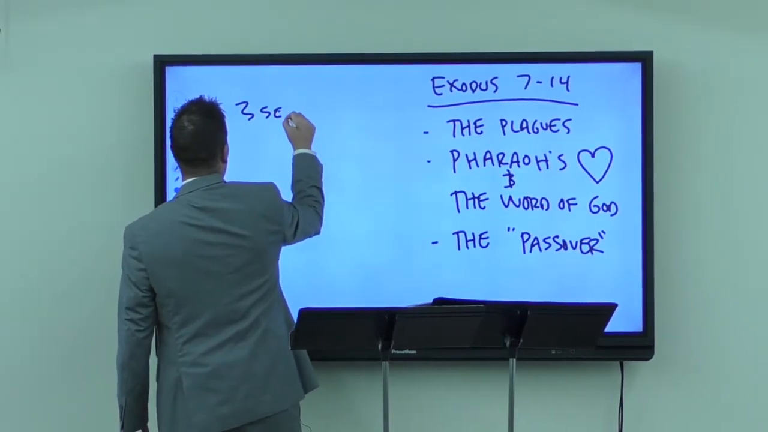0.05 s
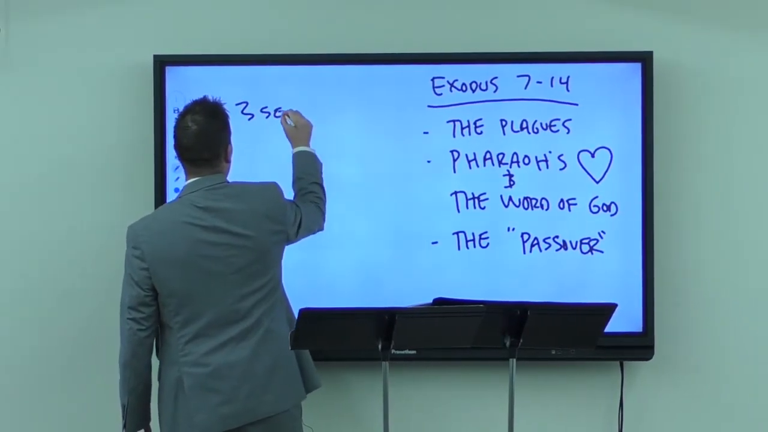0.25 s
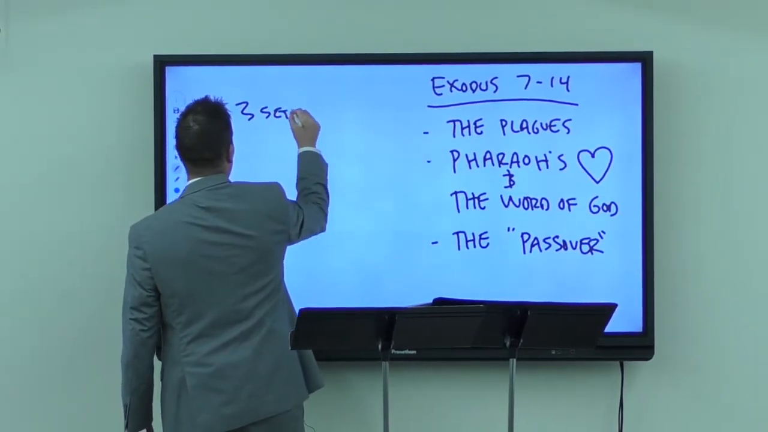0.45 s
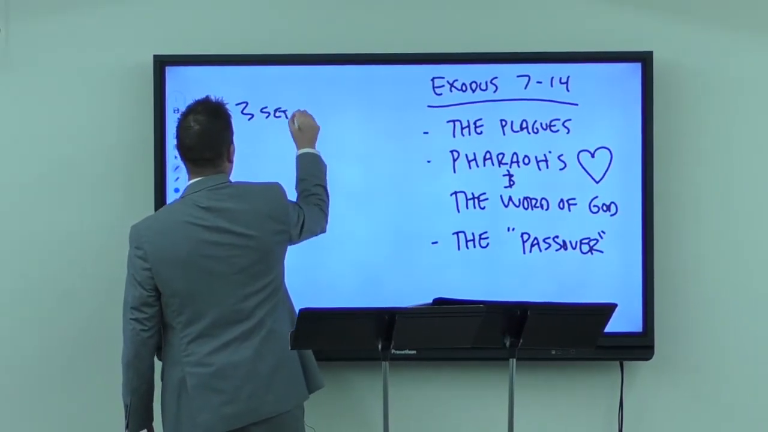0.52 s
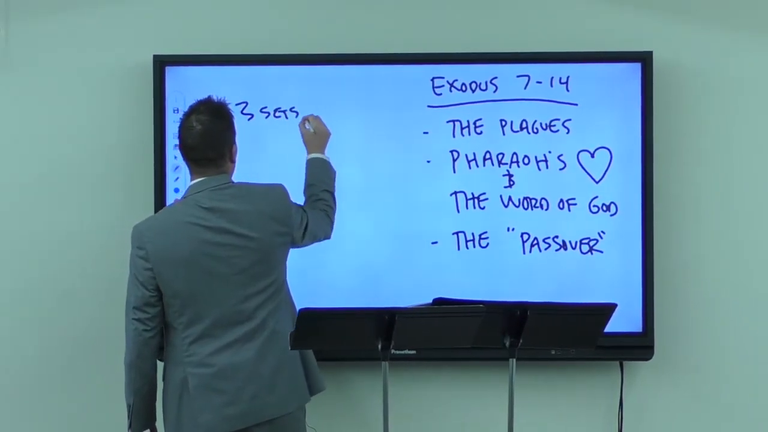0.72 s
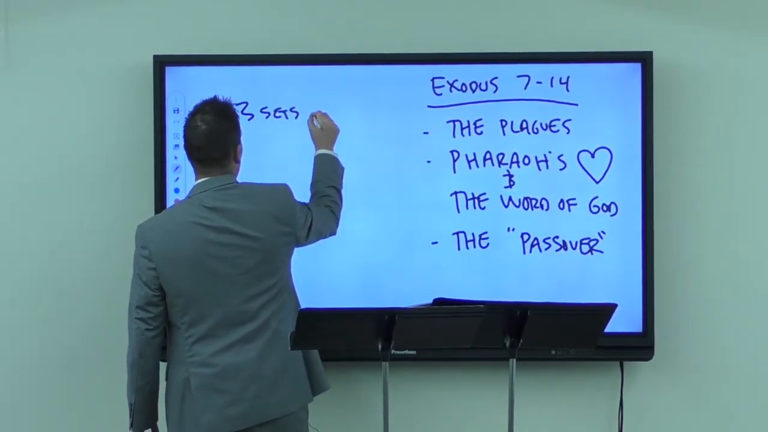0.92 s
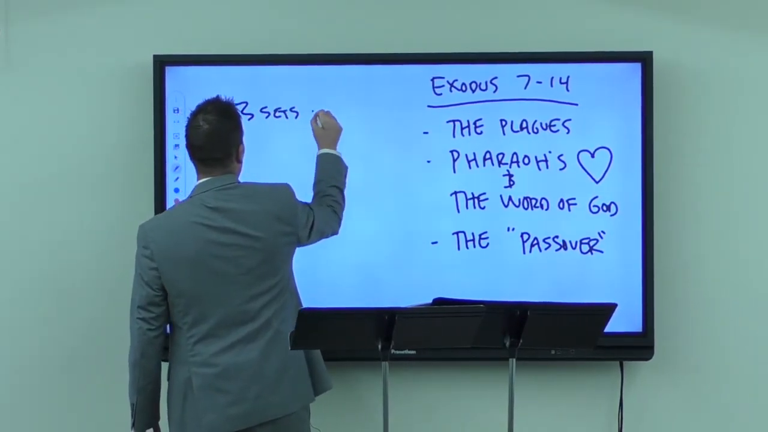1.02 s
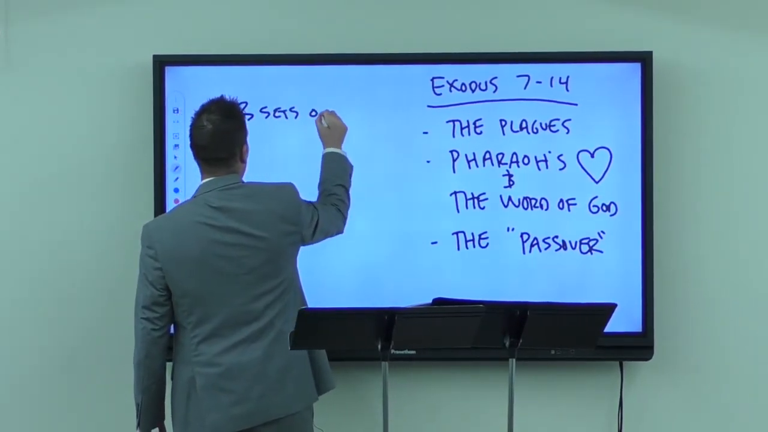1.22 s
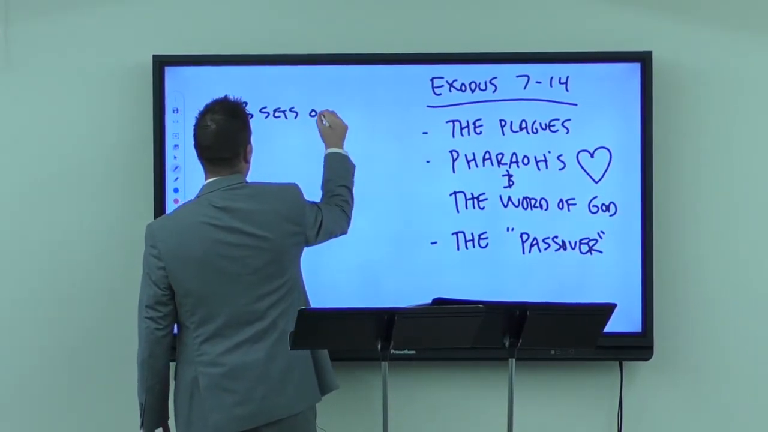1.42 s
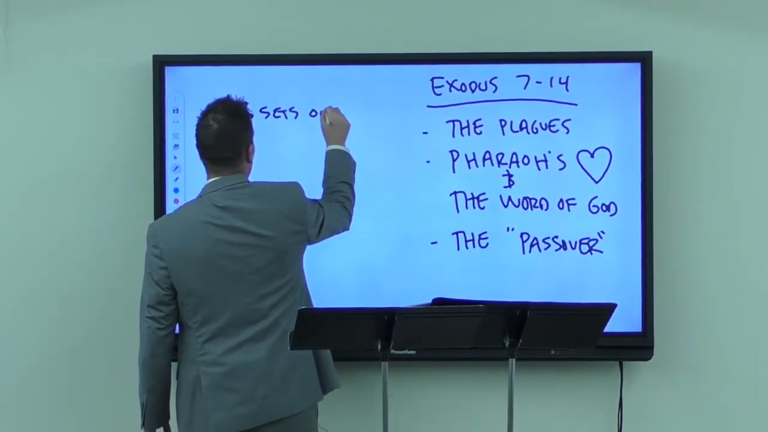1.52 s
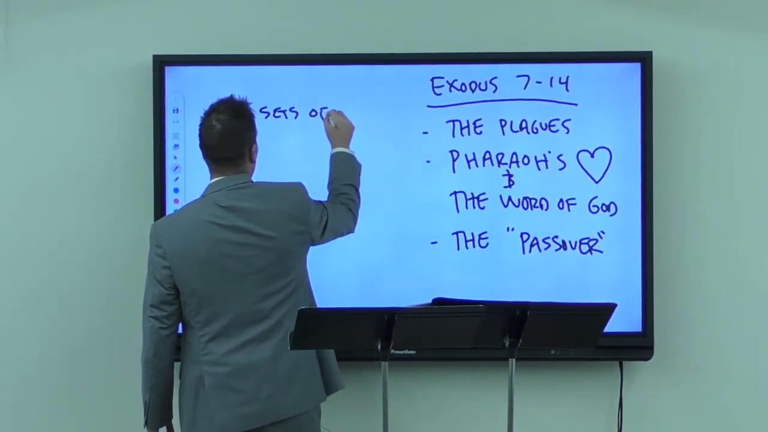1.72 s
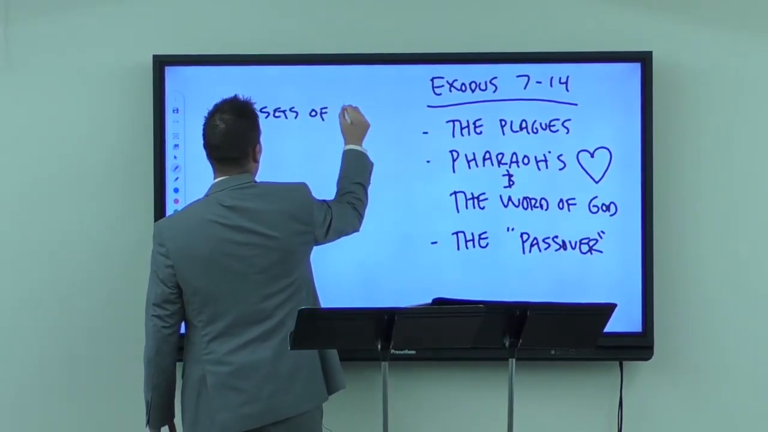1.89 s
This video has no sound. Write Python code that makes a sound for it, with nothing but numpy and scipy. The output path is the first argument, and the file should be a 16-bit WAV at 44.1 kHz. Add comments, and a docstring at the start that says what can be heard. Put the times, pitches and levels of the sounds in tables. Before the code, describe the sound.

A stylus writes on a large wall-mounted glass touchscreen: seven sharp, hollow taps at uneven gaps, with a few faint brushes between, ringing briefly in a hall over low ventilation, heard in mono at some distance.

```python
"""First the fading reverberation of a tap is heard over low ventilation: a stylus writes on wall-mounted glass.
Filtered noise and steady sines make the ventilation; short bands of noise make the brushing of the tip.
Each tap sums damped panel modes (the hollow knock) and a dense crack (the sharp tick).
Convolution with the hall's response adds a few echoes, standing waves and a tail to taps and brushes.
"""
import sys
import numpy as np
from scipy import signal
from scipy.fft import rfft, irfft
from scipy.io import wavfile

SR = 44100
rng = np.random.default_rng(int(sys.argv[2]) if len(sys.argv) > 2 else 0)


def inscribe(sig):
    """Save sig as 16-bit PCM at rate SR to the path in sys.argv[1].

    A 1-D sig is mono; a 2-D sig holds one channel per row.
    Samples are clipped to [-1, 1] before scaling.
    """
    pcm = np.round(np.clip(np.atleast_2d(sig).T, -1, 1) * 32767)
    wavfile.write(sys.argv[1], SR, pcm.astype(np.int16))


N = 85995
TIME = np.arange(N) / SR  # s

# Spectrum of the ventilation air, relative: (frequency [Hz], density [dB per Hz])
AIR_SPECTRUM = [(15, -24), (25, -7), (80, -4.5), (180, -29.5), (796, -28.5), (1940, -41), (2220, -39.5),
                (3620, -42.5), (5000, -43.5), (16000, -51)]
AIR_DB = -54  # rms
# Steady hum of the ventilation: (frequency [Hz], rms level [dB])
HUM_TONES = [(58, -61), (120, -69.5)]

# Echoes off the nearest walls, before the wall's low-pass: (delay [s], level [dB])
WALL_ECHOES = [(.0125, -28.5), (.024, -23), (.029, -20), (.041, -21), (.088, -28)]
ECHO_T60_S, WALL_CUT_HZ = 0.0068, 4700
# Spectrum of the hall's tail against the direct sound: (frequency [Hz], level [dB])
TAIL_SPECTRUM = [(115, -0.5), (190, 1), (290, 1.5), (390, -2), (500, -17), (750, -8.5), (1250, -13),
                 (1800, -9), (2500, -16.5), (3800, -11), (5800, -23.5), (12000, -14)]
# Reverberation time of the tail: (frequency [Hz], t60 [s])
TAIL_T60 = [(125, 0.76), (500, 0.6), (1200, 0.54), (4000, 0.55), (8000, 0.69), (14000, 0.44)]
TAIL_BUILD_S = 0.007
# Standing waves of the hall: (frequency [Hz], peak gain [dB], t60 [s])
STANDING_WAVES = [(122.4, -64, 0.5), (249, -60.5, 0.55), (304, -51.5, 0.55), (369.6, -60.5, 0.93)]
# Bright scatter from the wall, the writer and the stands
NEAR_DB, NEAR_T60_S = -15.5, 0.077
NEAR_ABOVE_HZ, NEAR_BELOW_HZ = 750, 2040

# Rubs of the tip or sleeve on the glass, rms level before the envelope:
# (time [s], level [dB], centre [Hz], width [octaves], t60 [s])
RUBS = [(.657, -52.5, 3220, 0.4, 0.017), (0.747, -56, 1040, 0.61, 0.36), (.747, -58, 2820, 0.43, 0.11),
        (1.579, -55, 10200, .4, 0.0071), (1.848, -46, 770, .45, 0.15), (1.85, -52, 188, 0.7, .8),
        (1.914, -52.5, 757, 0.88, 0.1)]
BRUSH_ATTACK_S = 0.003  # time constant

# Spectrum of the crowd of fine modes at the contact: (frequency [Hz], density [dB per Hz])
CRACK_SPECTRUM = [(200, -2), (700, -0.5), (1300, 8.5), (1750, -9), (2550, 2), (3300, -7.5), (4300, -4.5),
                  (5100, -16), (5650, 1), (6200, -3), (6800, -15), (7500, -13), (9500, -24), (12500, -33),
                  (16000, -49)]
# Overall gain, decay of the noise that gives the phases, and final damping
CRACK_DB, CRACK_T60_S, CRACK_DAMPING_S = 21.5, 0.027, 0.05

# Modes of the glass panel and its frame, before each tap's colour and pitch ratio:
# (frequency [Hz], level [dB], t60 [s])
PANEL_MODES = [(136.2, -13, 0.069), (244.7, -19, 0.09), (483.5, -3, 0.061), (576, -1.5, 0.037),
               (1015, -12, 0.01), (1067, -25.5, 0.062), (1213, -11, 0.032), (1399, -8, 0.023),
               (1440, -28, 0.018), (2004, -27, 0.022), (2640, -37.5, 0.0072), (2920, -41.5, 0.0033)]
# The glass gives under the tip and springs back; also before colour and pitch ratio
FLEX_HZ, FLEX_DB, FLEX_T60_S = 1122, -4, 0.016
TAP_LOW_CUT_HZ = 90

# Landings of the stylus; how well each drives a range depends on the spot:
# (time [s], level [dB], thump [dB], knock [dB], ring [dB], clack [dB], tick [dB], top [dB], pitch [ratio])
LANDINGS = [(-.13, -15, -3, 4, 5.5, 4, 10, 0, 1.003), (.2293, -13.5, -4.5, 2.5, -1.5, 0, 1, -1, 0.986),
            (0.4321, -15.5, -3, 1, -5, 0, 1.5, 3.5, .995), (0.8997, -15, -0.5, 0, -8, 3.5, 0, 1, 1.015),
            (1.0304, -22.5, -3, -1, 10.5, 1, -6, -15, 0.978),
            (1.2148, -15, 0, -4.5, 2, 2.5, -1.5, 13.5, 0.975),
            (1.4752, -15, -1, 1, -2, 5.5, 3.5, 9.5, 0.99), (1.6583, -18, 0.5, -2.5, 5, 3, -2, 10.5, 0.98)]
# Centres of the ranges: thump, knock, ring, upper ring, clack, tick, top: (frequency [Hz])
RANGE_CENTRES = [300, 520, 900, 1300, 2800, 6000, 13000]


def from_db(db):
    """Logarithmic level: decibels become an amplitude gain."""
    return 10 ** (np.asarray(db) / 20)


def at_hz(points, hz):
    """Spectral interpolation: reads a table along a logarithmic frequency axis."""
    points = np.array(points)
    return np.interp(np.log(hz + 1e-9), np.log(points[:, 0]), points[:, 1])


def dying(t, t60):
    """Exponential decay: the amplitude falls by 60 dB in t60."""
    return np.exp(-np.log(1000) * t / t60)


def noise(size, gain_at):
    """Spectral shaping: white noise is weighted by a gain at each frequency."""
    spectrum = rfft(rng.standard_normal(size))
    return irfft(spectrum * gain_at(np.fft.rfftfreq(size, 1 / SR)), size)


def rms_one(x):
    """Power normalisation: scales to an rms of 1."""
    return x / np.sqrt(np.mean(x ** 2) + 1e-20)


def add(out, s, sound):
    """Superposition: mixes a sound in at a time, clipped to the ends of the output."""
    start = int(round(s * SR))
    part = sound[max(-start, 0):len(out) - start]
    first = max(start, 0)
    out[first:first + len(part)] += part


def ventilation():
    """Stationary broadband noise: steady air, with a low hum of pure tones."""
    out = from_db(AIR_DB) * rms_one(noise(N, lambda hz: from_db(at_hz(AIR_SPECTRUM, hz))))
    for hz, db in HUM_TONES:
        peak = np.sqrt(2) * from_db(db)
        out += peak * np.sin(2 * np.pi * (hz * TIME + rng.random()))
    return out


def early_sound():
    """Specular reflection: the direct impulse and smeared echoes dulled by the walls."""
    echoes = np.zeros(SR)
    t = TIME[:SR // 20]
    for s, db in WALL_ECHOES:
        smear = rng.standard_normal(len(t)) * dying(t, ECHO_T60_S)
        add(echoes, s, from_db(db) * smear / np.linalg.norm(smear))
    out = signal.sosfilt(signal.butter(1, WALL_CUT_HZ, fs=SR, output="sos"), echoes)
    out[0] += 1  # direct path
    return out


def tail():
    """Diffuse reverberation: bands of noise build up together and die at their own rates."""
    t = TIME[:SR]
    out = np.zeros(SR)
    build = 1 - np.exp(-(t / TAIL_BUILD_S) ** 2)
    edges = np.geomspace(60, 17000, 18)  # Hz
    for low, high in zip(edges, edges[1:]):
        fade = build * dying(t, at_hz(TAIL_T60, np.sqrt(low * high)))
        band = noise(SR, lambda hz: (hz >= low) * (hz < high) * from_db(at_hz(TAIL_SPECTRUM, hz)))
        out += band * fade / np.linalg.norm(fade)
    return out


def near_scatter():
    """Scattering by nearby surfaces: a band of noise that decays quickly."""
    def band(hz):
        rise = hz ** 2 / (hz ** 2 + NEAR_ABOVE_HZ ** 2)
        return rise / (1 + (hz / NEAR_BELOW_HZ) ** 2)

    scatter = dying(TIME[:SR], NEAR_T60_S) * noise(SR, band)
    return from_db(NEAR_DB) * scatter / np.linalg.norm(scatter)


def standing_waves():
    """Room resonance: each low mode of the hall is a damped sine."""
    t = TIME[:SR]
    return sum(from_db(db) * np.sin(2 * np.pi * hz * t) * dying(t, t60) for hz, db, t60 in STANDING_WAVES)


def hall():
    """Impulse response: direct sound, reflections, diffuse tail, scatter and room modes add linearly."""
    return early_sound() + tail() + near_scatter() + standing_waves()


def brush(centre_hz, octaves, t60):
    """Frictional noise: a band of noise, bell-shaped in octaves, swells briefly and decays."""
    t = TIME[:SR // 4]

    def bell(hz):
        return np.exp(-0.5 * (np.log2((hz + 1) / centre_hz) / octaves) ** 2)

    rub = rms_one(noise(len(t), bell))
    return rub * (1 - np.exp(-t / BRUSH_ATTACK_S)) * dying(t, t60)


def crack(colour):
    """High modal density: fine modes merge into a burst with random phases and a set spectrum."""
    t = TIME[:SR // 8]
    burst = rfft(rng.standard_normal(len(t)) * dying(t, CRACK_T60_S))
    hz = np.fft.rfftfreq(len(t), 1 / SR)
    phases = burst / np.abs(burst)  # evened out, so that every tap keeps the colour of the glass
    level_db = CRACK_DB + at_hz(CRACK_SPECTRUM, hz) + at_hz(colour, hz)
    even = irfft(phases * from_db(level_db), len(t))
    return (even * dying(t, CRACK_DAMPING_S))[:len(t) // 2]


def tap(colour, pitch):
    """Modal superposition: glass flexure and panel modes of alternating sign ring under a crack."""
    t = TIME[:SR // 2]

    def mode(hz, db, t60):
        gain = from_db(db + at_hz(colour, hz))
        return gain * np.sin(2 * np.pi * hz * pitch * t) * dying(t, t60)

    knock = -mode(FLEX_HZ, FLEX_DB, FLEX_T60_S)
    for k, row in enumerate(PANEL_MODES):
        knock += (-1) ** (k + 1) * mode(*row)
    add(knock, 0, crack(colour))
    # the lowest frequencies of each tap are cut away
    return signal.sosfilt(signal.butter(2, TAP_LOW_CUT_HZ, "high", fs=SR, output="sos"), knock)


def stylus():
    """Convolution: each tap is convolved with a freshly drawn hall response; the rubs share one."""
    out = np.zeros(N)
    for s, db, thump_db, knock_db, ring_db, clack_db, tick_db, top_db, pitch in LANDINGS:
        range_db = [thump_db, knock_db, ring_db, 0, clack_db, tick_db, top_db]  # upper ring stays at 0
        colour = list(zip(RANGE_CENTRES, range_db))
        landing = tap(colour, pitch)
        add(out, s, from_db(db) * signal.fftconvolve(landing, hall()))
    rubs = np.zeros(N)
    for s, db, centre_hz, octaves, t60 in RUBS:
        add(rubs, s, from_db(db) * brush(centre_hz, octaves, t60))
    return out + signal.fftconvolve(rubs, hall())[:N]


def scene():
    """Linear superposition: the writing and the ventilation add in mono."""
    return (stylus() + ventilation())[None]


def record(dry):
    """Band limiting: a steep elliptic low-pass at 16 kHz removes the top."""
    return signal.sosfilt(signal.ellip(10, 0.1, 80, 16000, fs=SR, output="sos"), dry)


dry = scene()
out = record(dry)
inscribe(out)
```